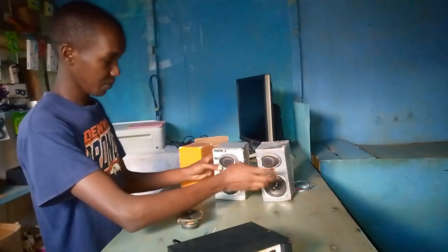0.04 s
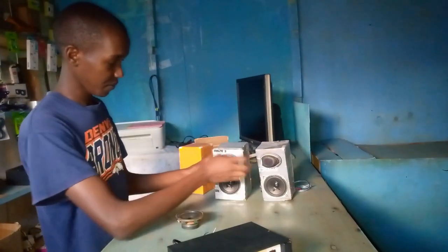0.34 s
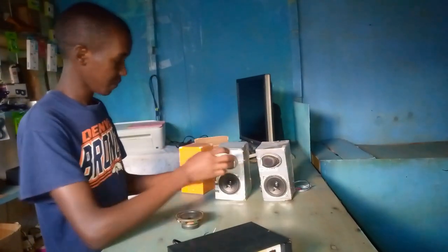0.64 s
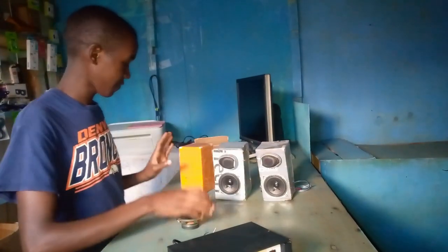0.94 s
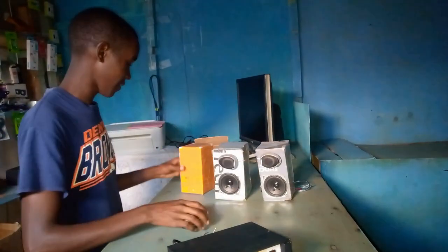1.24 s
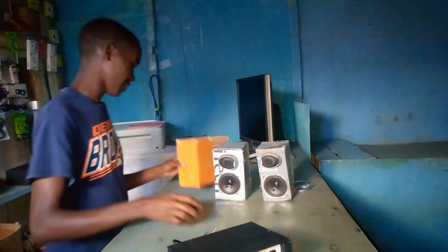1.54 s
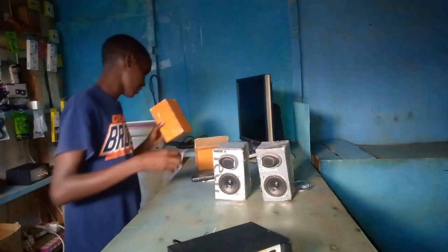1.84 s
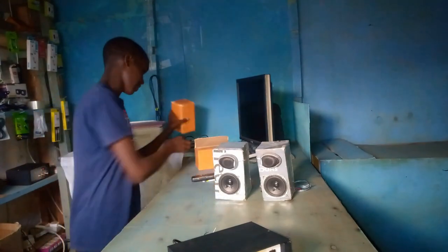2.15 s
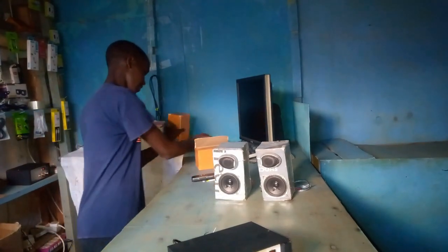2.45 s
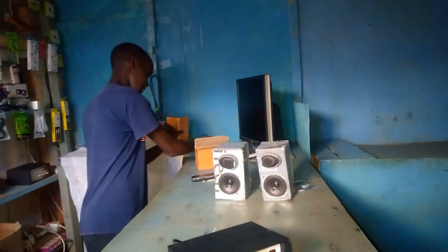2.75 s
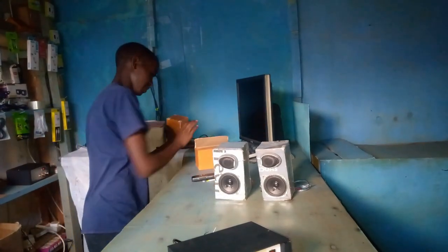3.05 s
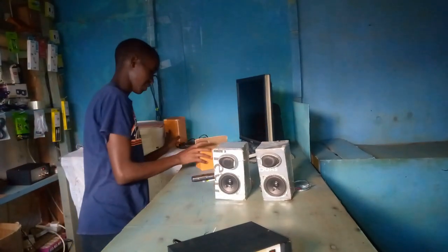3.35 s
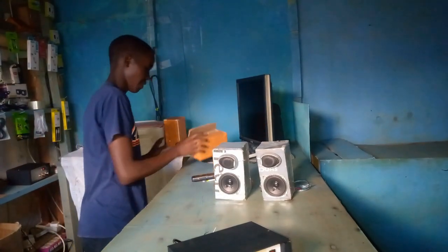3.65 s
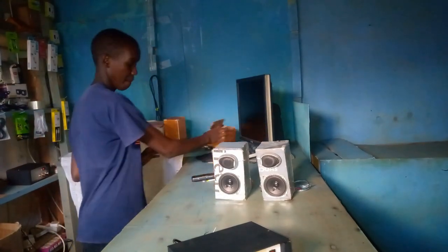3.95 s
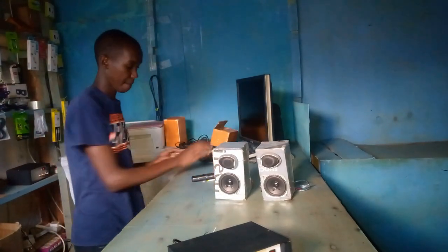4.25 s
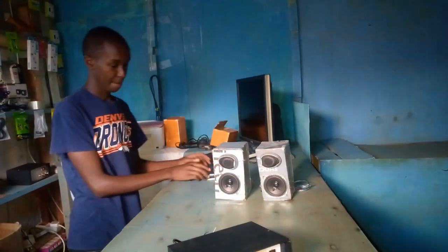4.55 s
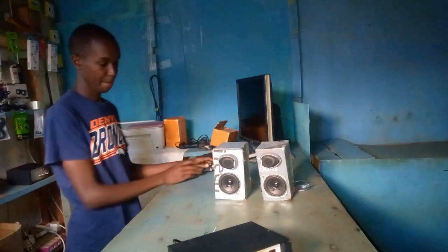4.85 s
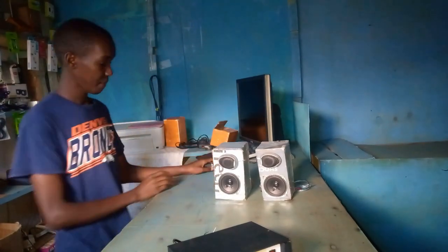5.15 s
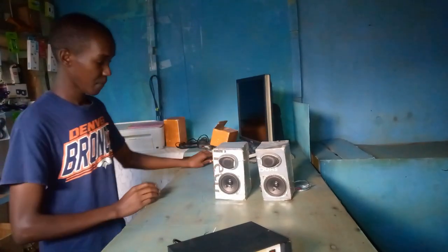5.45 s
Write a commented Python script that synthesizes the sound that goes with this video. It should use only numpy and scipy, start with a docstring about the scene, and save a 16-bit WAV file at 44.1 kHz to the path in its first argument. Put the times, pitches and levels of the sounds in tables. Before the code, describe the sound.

Small cardboard boxes knock, slide and rustle on a wooden workbench, then a hand tool scrapes and bangs close by in a small room.

```python
"""Boxes and a tool on a workbench

Small cardboard boxes are lifted, slid and set down on a wooden bench in a small hard-walled room.
Fingernails tick on plastic cabinets, the bench thuds, cardboard rubs and crunches at the far end; then
a hand tool is dragged and knocked close by, overloading the microphone, and a cabinet is nudged.
Impacts ring damped modes; sliding surfaces excite resonances by stick-slip friction."""
import sys
import numpy as np
from scipy import signal
from scipy.fft import rfft, irfft
from scipy.io import wavfile

SR = 44100
rng = np.random.default_rng(int(sys.argv[2]) if len(sys.argv) > 2 else 0)


def to_wav(s):
    """Save 16-bit WAV."""
    ch = np.atleast_2d(s).T  # columns
    pcm = np.round(np.clip(ch, -1, 1) * 32767)  # PCM
    wavfile.write(sys.argv[1], SR, pcm.astype(np.int16))


N = 246230
FFT_SIZE = 4096
GRID_HZ = np.maximum(np.fft.rfftfreq(FFT_SIZE, 1 / SR), 1)
# edges [Hz] of the five bands in which every bands_db list gives a relative level [dB]
BAND_EDGES_HZ = [100, 450, 1300, 3500, 8000, 16000]
# resonances of rubbed cardboard: (frequency [Hz], width [Hz], lift [dB])
CARDBOARD_RESONANCES = [(260.3, 250, 13.5), (406, 26, 9), (606, 67, 8.5), (1070, 310, 5), (1610, 243, 4)]


def undb(db):
    """Decibels to amplitude ratio."""
    return 10 ** (np.asarray(db) / 20)


def clock(length_s):
    """Sample times in seconds."""
    return np.arange(max(int(length_s * SR), 2)) / SR


def unit(x):
    """Scale to rms 1."""
    return x / np.sqrt(np.mean(x ** 2) + 1e-18)


def add(track, start_s, sound):
    """Superpose a sound on the track."""
    i = int(np.clip(start_s * SR, 0, N - 1))
    track[i:i + len(sound)] += sound[:N - i]


def low_cut(x, hz, order):
    """High-pass filter: small surfaces and small microphones pass little bass."""
    return signal.sosfilt(signal.butter(order, hz, "high", fs=SR, output="sos"), x)


def colour(x, gain_db):
    """Minimum-phase filter with the given gain on the frequency grid."""
    cepstrum = irfft(gain_db * np.log(10) / 20)
    cepstrum[1:FFT_SIZE // 2] *= 2
    cepstrum[FFT_SIZE // 2 + 1:] = 0
    return signal.fftconvolve(x, irfft(np.exp(rfft(cepstrum))))


def tilted(bands_db, db, tilt_db):
    """Spectral tilt: band levels are raised by db and pivoted about their centre of power."""
    edges = np.array(BAND_EDGES_HZ)
    octaves = np.log2(edges[1:] * edges[:-1]) / 2
    pivot = np.average(octaves, weights=undb(bands_db) ** 2)
    return np.array(bands_db) + db + tilt_db * (octaves - pivot)


def band_shape(bands_db, resonances, bass_hz=145, treble_hz=13000):
    """Resonance peaks on a smooth gain curve that brings unit white noise near the band levels."""
    edges = np.array(BAND_EDGES_HZ)
    log_centres = np.log(edges[1:] * edges[:-1]) / 2
    in_band = [(GRID_HZ >= lo) & (GRID_HZ < hi) for lo, hi in zip(edges, edges[1:])]
    fine_db = -11 * np.log10(1 + (bass_hz / GRID_HZ) ** 4) - 10 * np.log10(1 + (GRID_HZ / treble_hz) ** 8)
    for hz, width, lift_db in resonances:
        fine_db += lift_db / (1 + (2 * (GRID_HZ - hz) / width) ** 2)
    smooth_db, gain_db = 0, fine_db
    for _ in range(2):  # bend the smooth part until each band holds its power
        power = [np.mean(undb(gain_db) ** 2 * band) for band in in_band]
        smooth_db = smooth_db + np.array(bands_db) - 10 * np.log10(power)
        gain_db = fine_db + np.interp(np.log(GRID_HZ), log_centres, smooth_db)
    return gain_db


def clicks(contacts, bands_db, ring_s, ring_share, ring_db, tip_s=0.00046):
    """Impact excitation: a noise burst drives one resonance; a shorter contact has a sharper tip."""
    out, t = np.zeros(N), clock(0.03)
    span = len(clock(0.01))  # levels state the energy as an rms over 10 ms
    for start, db, tilt_db, hz, contact_s in contacts:
        envelope = np.exp(-t / contact_s) + ring_share * np.exp(-t / ring_s)
        push = unit(rng.standard_normal(len(t)) * envelope)
        push[0] += tip_s / contact_s * np.sqrt(len(t))
        push *= np.sqrt(span / np.sum(push ** 2))
        gain_db = band_shape(tilted(bands_db, db, tilt_db), [(hz, 0.23 * hz, ring_db)])
        add(out, start, colour(push, gain_db))
    return out


def stroke(length_s, rise_s, fall_s):
    """Exponential attack and release of a movement."""
    t = clock(length_s + 6 * fall_s)
    return (1 - np.exp(-t / rise_s)) * np.exp(-np.maximum(t - length_s, 0) / fall_s)


def friction(size, rate_hz, spread_db, hiss, catch_hz=160, catch_db=3):
    """Stick-slip: many small releases and a few large ones over a hiss, swelling where surfaces catch."""
    slips = (rng.random(size) < rate_hz / SR) * rng.choice([-1, 1], size)
    strength = undb(spread_db * np.minimum(rng.exponential(size=size), 3))
    position = np.arange(size) * catch_hz / SR
    roughness = np.clip(rng.standard_normal(int(position[-1]) + 2), -2, 2)
    grip = undb(catch_db * np.interp(position, np.arange(len(roughness)), roughness))
    return unit(grip * (unit(slips * strength) + hiss * rng.standard_normal(size)))


def scrapes(strokes, bands_db, resonances, rate_hz, spread_db, hiss, rise_s, fall_s):
    """Source and filter: friction is heard through the resonances of the rubbed body."""
    out = np.zeros(N)
    for start, end, db, tilt_db in strokes:
        envelope = stroke(max(end - start, 0.005), rise_s, fall_s)
        force = envelope * friction(len(envelope), rate_hz, spread_db, hiss)
        add(out, start, colour(force, band_shape(tilted(bands_db, db, tilt_db), resonances)))
    return out


def knocks(blows, modes, crack_db, crack_s, detune=0.0084):
    """Modal ringing: a blow starts damped sinusoids; the many weaker modes merge in a noisy crack."""
    out, t = np.zeros(N), clock(0.4)
    mode_hz, mode_db, _ = np.transpose(modes)
    skirts_db = -20 * np.log10(1 + (GRID_HZ / mode_hz[-1]) ** 2 + (mode_hz[0] / GRID_HZ) ** 2)
    crack_shape = np.interp(np.log(GRID_HZ), np.log(mode_hz), mode_db) + skirts_db
    for start, db, ratio in blows:
        ring = np.zeros(len(t))
        for k, (hz, gain_db, t60) in enumerate(modes):
            phase = 2 * np.pi * hz * ratio * (1 + detune * rng.standard_normal()) * t
            ring += (-1) ** k * undb(gain_db) * np.sin(phase) * undb(-60 * t / t60)
        burst = rng.standard_normal(len(t)) * np.exp(-t / crack_s)
        crack = colour(burst, crack_shape)[:len(t)]
        knock = ring / np.abs(ring).max() + undb(crack_db) * crack / np.abs(crack).max()
        add(out, start, undb(db) * knock)
    return out


def noise_floor(level_db=-49.5):
    """Stationary noise: microphone hiss and quiet room air."""
    spectrum = [(18, -37), (30, -10.5), (332, -4), (399, -6.5), (532, -4.5), (1200, -7), (1970, -9.5),
                (3780, -11.5), (4780, -11.5), (5170, -14), (5890, -13.5), (15500, -16.5)]  # (frequency [Hz], relative density [dB])
    hz, db = np.transpose(spectrum)
    gain_db = np.interp(np.log(GRID_HZ), np.log(hz), db)
    return undb(level_db) * unit(colour(rng.standard_normal(N), gain_db)[:N])


def fingernails():
    """Brief hard contact: nails tick on plastic and card."""
    # (time [s], level [dB], tilt [dB/octave], resonance [Hz], contact [s])
    ticks = [(.017, -45.5, 2, 4000, 0.00096), (.2283, -37.5, -1, 2750, 0.00034),
             (.6842, -30, -1.2, 1800, .0005), (.9818, -52.5, 3, 2910, 0.0015),
             (1.1641, -31, 1.5, 2300, 0.0004), (3.6135, -31, 0, 2070, 0.0011), (4.47, -42.5, 6, 4020, .002),
             (5.177, -31, -7.5, 1680, .003), (5.224, -35.5, -1, 2490, .0028),
             (5.275, -28.5, -4.5, 1820, 0.0015), (5.285, -29, -4.5, 1740, 0.0024),
             (5.3773, -40, -3, 1790, 0.003), (5.5612, -27, -4.5, 2450, 0.0029),
             (5.5683, -15, -2.5, 3270, .00065)]
    bands_db = [-14.5, -7.5, 0.5, -3.5, -12.5]
    return clicks(ticks, bands_db, ring_s=0.0043, ring_share=0.73, ring_db=7.5)


def edge_snaps():
    """Elastic release: hard edges catch and snap free."""
    # (time [s], level [dB], tilt [dB/octave], resonance [Hz], contact [s])
    snaps = [(.0673, -38.5, -0.9, 6100, .0005), (3.0008, -44, 2, 6530, .0004),
             (3.397, -36, 0.5, 5800, 0.0008), (3.8911, -39, -3, 4500, 0.00085),
             (4.6178, -13.5, -0.5, 5260, .001), (4.6858, -16, -1, 4750, 0.0035),
             (4.8373, -14, -0.5, 6550, .0005), (4.888, -27.5, -1, 5170, 0.0018),
             (4.9423, -39.5, 9, 6960, .003), (4.995, -41.5, -0.5, 7500, 0.00057),
             (5.158, -33.5, -4, 4870, .0005), (5.2, -21.5, -0.5, 4900, 0.00063)]
    bands_db = [-15.5, -11, -9.5, -1.5, -9]
    return clicks(snaps, bands_db, ring_s=0.005, ring_share=0.43, ring_db=11)


def box_slides_and_low_ring():
    """Sliding friction drives box resonances; the second row is a low ring after the first bench thud."""
    spans = [(.07, .14, -54.5, -1.5), (.35, .41, -58.5, -7.5), (1.385, 1.49, -44.5, 0.5),
             (1.505, 1.6, -50, 1.5), (2.46, 2.59, -53.5, 2.5), (2.6, 2.635, -42, 2), (2.92, 3.13, -40, 0),
             (3.13, 3.29, -46, 0.5), (3.33, 3.42, -40, 0.5), (3.43, 3.48, -35.5, -0.5),
             (3.93, 3.985, -30, 0), (4.155, 4.2, -27.5, 0)]  # (start [s], end [s], level [dB], tilt [dB/octave])
    bands_db = [0, 0, -10, -15.5, -22]
    return scrapes(spans, bands_db, CARDBOARD_RESONANCES,
                   rate_hz=3500, spread_db=2, hiss=1.45, rise_s=0.00062, fall_s=0.0077)


def bench_thuds():
    """Plate vibration: soft blows ring the low modes of the bench top."""
    blows = [(.272, -21, 1), (.557, -25.5, 0.88), (.639, -29, 1.27), (1.502, -32.5, 1.4),
             (2.599, -23, 1.26), (2.796, -19, 0.95), (3.3, -21, 1.1), (3.446, -21, 0.89),
             (3.464, -28, 0.99), (3.903, -23.5, 1.04), (3.932, -19, 1.118), (4.09, -17.5, 1.135),
             (4.157, -15, 0.99), (4.184, -24, 0.98), (4.852, -8, 0.94), (4.87, -16.5, 1.215),
             (4.94, -17.5, 0.934), (5.195, -22, 0.99), (5.262, -18, 0.88), (5.28, -31, 0.95),
             (5.57, -16.5, 0.86)]  # (time [s], level [dB], pitch ratio)
    modes = [(176.6, -3.5, 0.088), (216.3, -1.5, 0.043), (275.4, -8, 0.069), (329.8, -11, 0.0755),
             (455, -21, 0.103), (710, -24.5, 0.09)]  # (frequency [Hz], level [dB], T60 [s])
    return low_cut(knocks(blows, modes, crack_db=-1.5, crack_s=0.014), hz=92.5, order=3)


def corner_bumps():
    """Damped impact: carton corners bump the bench and each other."""
    # (time [s], level [dB], tilt [dB/octave], resonance [Hz], contact [s])
    bumps = [(.2741, -37.5, 3.5, 481, 0.0027), (.6436, -31.5, -1, 564, 0.0017), (1.3675, -43, 2, 605, .002),
             (1.5006, -26, 1, 1500, 0.0028), (2.6115, -36, 2, 815, 0.0034), (2.7619, -14, -2, 1110, .0036),
             (2.796, -28, 1, 1090, .0034), (3.277, -35.5, -1.5, 667, .001), (3.2974, -25, 2, 614, 0.00063),
             (3.508, -40, -1, 640, .0014), (3.9327, -28, -4, 590, 0.0019), (3.9451, -23, 0.5, 1150, .0024),
             (3.9506, -24, 1, 860, 0.0017), (4.155, -17, .3, 940, 0.0012)]
    bands_db = [-10.5, -1, -7, -16.5, -26.5]
    return clicks(bumps, bands_db, ring_s=0.0071, ring_share=0.48, ring_db=6)


def finger_rubs():
    """Light friction, mostly hiss: fingers and cloth brush over cardboard."""
    rubs = [(.275, .305, -45.5, -3.5), (1.18, 1.29, -51, -2), (1.405, 1.455, -46, 3.5),
            (1.675, 1.7, -47.5, -0.5), (1.7, 1.722, -39, -.3), (1.79, 1.98, -52.5, 0),
            (1.99, 2.04, -48.5, 0), (2.402, 2.43, -49.5, -2.5), (3.5, 3.54, -54.5, 4.5),
            (4.47, 4.53, -41, 0)]  # (start [s], end [s], level [dB], tilt [dB/octave])
    bands_db = [-15, -6, 1, 0, -9.5]
    return scrapes(rubs, bands_db, CARDBOARD_RESONANCES,
                   rate_hz=2900, spread_db=6.5, hiss=2.3, rise_s=0.0016, fall_s=0.0165)


def hollow_knocks():
    """Hollow-body resonance: struck cartons and cabinets ring with almost no crack."""
    blows = [(.422, -36.5, 0.98), (.6435, -26, 1.04), (1.5015, -26, 1.47), (1.52, -26.5, 0.99),
             (3.2985, -5, 1), (3.447, -24, 1.03)]  # (time [s], level [dB], pitch ratio)
    modes = [(248.7, -4.5, 0.093), (323, -8.5, 0.1), (375, -3, 0.043), (421, 1.5, 0.062), (571, -3, 0.083),
             (650, -3.5, 0.11), (716, -10.5, 0.041), (1340, -29, 0.137), (1500, -44, 0.086)]  # (frequency [Hz], level [dB], T60 [s])
    return low_cut(knocks(blows, modes, crack_db=-43, crack_s=0.0064), hz=184, order=3)


def plastic_taps():
    """Shell vibration: light taps ring the high, short-lived modes of thin plastic."""
    taps = [(.6846, -19.5, 0.98), (2.404, -31, 0.76), (3.6137, -20.5, 1.037), (5.2755, -18, 1.1),
            (5.286, -18, 1.12)]  # (time [s], level [dB], pitch ratio)
    modes = [(1267, -1.5, 0.031), (1475, 3, 0.034), (1596, -4.5, 0.019), (1840, -1, 0.014),
             (2020, -1, 0.019), (2240, -2, 0.0218), (3120, -25, 0.037)]  # (frequency [Hz], level [dB], T60 [s])
    return knocks(taps, modes, crack_db=-16, crack_s=0.0047)


def box_landings():
    """Panel vibration: a closed box lands edge first and rocks, ringing at each blow."""
    blows = [(2.7562, -8, 0.99), (2.7618, -7, 0.97), (2.778, -20, 0.92), (2.8, -30, 1), (4.0865, -13, 0.98),
             (4.1015, -11, 0.93)]  # (time [s], level [dB], pitch ratio)
    modes = [(167, -6.5, 0.13), (360, -1, 0.095), (750, -10, 0.089), (980, -10, 0.39), (1165, 4, 0.092),
             (1366.4, -1, 0.11), (1460, -12.5, 0.123), (1670, -8, 0.14), (1817, 5, 0.019), (1984, -17, 0.1),
             (2160, -5.5, 0.029), (2860, -15, 0.043)]  # (frequency [Hz], level [dB], T60 [s])
    return low_cut(knocks(blows, modes, crack_db=-9, crack_s=0.0028), hz=161, order=4)


def flap_crunch():
    """Bursts of stick-slip drive the resonances of a stiff flap."""
    crunches = [(4.0845, 4.0895, -18.5, 0), (4.098, 4.11, -17.5, 0.65), (4.114, 4.15, -30.5, -.5)]  # (start [s], end [s], level [dB], tilt [dB/octave])
    resonances = [(790, 175, -1), (1180, 200, 1), (2170, 73, 6)]  # (frequency [Hz], width [Hz], lift [dB])
    bands_db = [-7, -1, -0.5, -1.5, -11]
    return scrapes(crunches, bands_db, resonances,
                   rate_hz=3500, spread_db=2.5, hiss=0.92, rise_s=0.00037, fall_s=0.0046)


def tool_drag(pull_start_s=4.606):
    """Stick-slip at two scales: the tool judders in coarse slips as its edge hisses over the grain."""
    # pulled until it catches, it then scuffs to rest: (time [s], judder level [dB], hiss level [dB])
    pull = [(4.636, -31, -37.5), (4.676, -24, -40), (4.688, -27, -25), (4.702, -26.5, -36),
            (4.738, -13.5, -26.5), (4.766, -12, -27.5), (4.784, -26, -26.5), (4.806, -23, -25.5),
            (4.83, -26, -32)]
    settle = [(4.882, -25, -37), (4.906, -29.5, -59), (4.948, -31, -43), (4.962, -32, -77),
              (5.05, -32.5, -56)]
    # low resonances, and narrow treble peaks that colour the hiss: (frequency [Hz], width [Hz], lift [dB])
    peaks = [(112, 60, -4), (178, 23, 4.5), (240, 38.4, 5), (360, 54, 2.5), (436, 18.4, 3), (524.5, 18, 9),
             (780, 24, 4.5), (1022, 85, 2.5), (1210, 170, 5.5), (1386, 65, 8.5), (1740, 340, 4.5),
             (2656, 730, -7.5), (4430, 49, 7), (4733, 42, 5), (5262, 63, 2), (5600, 33, 3), (6298, 24.5, 2),
             (11650, 1430, 5), (15700, 1930, -17)]
    judder_bands_db = [-2.5, -4, -8.5, -29, -36]
    hiss_bands_db = [-24, -9, 2.5, 6.5, -1.5]
    out = np.zeros(N)
    for start, curve in ((pull_start_s, pull), (settle[0][0], settle)):
        times, judder_db, hiss_db = np.transpose(curve)
        t = start + clock(times[-1] - start)
        judder = friction(len(t), rate_hz=1000, spread_db=3.8, hiss=0.74, catch_db=2.5)
        judder *= undb(np.interp(t, times, judder_db))
        hiss = friction(len(t), rate_hz=2500, spread_db=1, hiss=1, catch_db=2)
        hiss *= undb(np.interp(t, times, hiss_db))
        add(out, start, colour(judder, band_shape(judder_bands_db, peaks)))
        add(out, start, colour(hiss, band_shape(hiss_bands_db, peaks)))
    return out


def tool_knocks():
    """Hard impact: the tool strikes the bench close by."""
    # (time [s], level [dB], tilt [dB/octave], resonance [Hz], contact [s])
    strikes = [(4.7657, -14.5, 2.5, 1290, 0.002), (4.8484, -8, 0.5, 1150, 0.00036),
               (4.8672, -8.5, 0.5, 1000, 0.00053), (4.8705, -13.5, -0.5, 1400, 0.0012)]
    bands_db = [-4.5, -1.5, -10.5, -19, -32]
    return clicks(strikes, bands_db, ring_s=0.0039, ring_share=0.34, ring_db=8)


def cabinet_nudges():
    """Sliding friction drives the resonances of a small speaker cabinet."""
    nudges = [(5.04, 5.14, -41.5, 2), (5.147, 5.19, -22.5, -0.5), (5.205, 5.25, -32.5, 1.5),
              (5.255, 5.293, -25, -0.5), (5.3, 5.4, -50.5, 2.5)]  # (start [s], end [s], level [dB], tilt [dB/octave])
    resonances = [(177, 59, 1.5), (256, 27, 8.5), (412, 150, -1), (940, 79, 8.5), (1290, 53, 9),
                  (1604, 260, 4.5), (1780, 200, 6.5), (2780, 850, -12), (4820, 1000, 6.5), (12000, 2600, 8)]  # (frequency [Hz], width [Hz], lift [dB])
    bands_db = [0.5, -5, -3, -16, -20.5]
    return scrapes(nudges, bands_db, resonances,
                   rate_hz=2200, spread_db=4, hiss=0.87, rise_s=0.0036, fall_s=0.0064)


def skid_whistles(width_hz=600):
    """Narrow-band noise: a smooth skid whistles faintly in one resonance."""
    skids = [(5.403, 5.483, -35, 4340), (5.492, 5.56, -38.5, 4300)]  # (start [s], end [s], level [dB], frequency [Hz])
    out = np.zeros(N)
    for start, end, db, hz in skids:
        envelope = stroke(end - start, rise_s=0.0426, fall_s=0.018)
        peak_db = -10 * np.log10(1 + (2 * (GRID_HZ - hz) / width_hz) ** 2)
        whistle = colour(rng.standard_normal(len(envelope)), peak_db)[:len(envelope)]
        add(out, start, undb(db) * envelope * unit(whistle))
    return out


def reverberation(direct, gap_s=0.0055, build_s=0.003, top_hz=9000):
    """Diffuse field: echoes build after a gap, die sooner in the treble and gain share with distance."""
    echo_levels = [(0, -14), (.65, -8), (1.5, -7.5), (2.6, -3.5), (3.5, -6), (4.55, -5.5), (4.87, -21),
                   (5.3, -19.5), (5.58, -17.5)]  # higher for distant sources: (time [s], level [dB])
    decay_times = [(150, 0.42), (400, 0.44), (1040, 0.5155), (2760, 0.5), (7280, 0.38), (15000, 0.29)]  # (frequency [Hz], T60 [s])
    t = clock(0.8)
    spectrum = rfft(rng.standard_normal(len(t)))
    hz = np.maximum(np.fft.rfftfreq(len(t), 1 / SR), 1)
    centres, t60s = np.transpose(decay_times)
    tail = np.zeros(len(t))
    for share, t60 in zip(np.eye(len(t60s)), t60s):
        band = irfft(spectrum * np.interp(np.log(hz), np.log(centres), share), len(t))
        tail += band * undb(-60 * t / t60)
    build_up = 1 - np.exp(-np.maximum(t - gap_s, 0) / build_s)
    tail = unit(tail * build_up) / np.sqrt(len(t))
    response = colour(tail, -10 * np.log10(1 + (GRID_HZ / top_hz) ** 4))
    send = undb(np.interp(np.arange(N) / SR, *np.transpose(echo_levels)))
    return low_cut(signal.fftconvolve(direct * send, response)[:N], hz=123, order=3)


def scene():
    """Superposition of direct sound, reverberation and noise in one channel."""
    direct = tool_drag() + skid_whistles()
    direct += fingernails() + edge_snaps() + corner_bumps() + tool_knocks()
    direct += bench_thuds() + box_landings() + hollow_knocks() + plastic_taps()
    direct += finger_rubs() + box_slides_and_low_ring() + flap_crunch() + cabinet_nudges()
    direct = low_cut(direct, hz=63, order=1)
    return (direct + reverberation(direct) + noise_floor())[None]


def record(dry, top_hz=15900):
    """Overload: the nearest knocks clip, and a steep low-pass filter limits the bandwidth."""
    clipped = np.clip(dry, -1, 1)
    return signal.sosfilt(signal.ellip(10, 0.2, 80, top_hz, fs=SR, output="sos"), clipped)


dry = scene()
out = record(dry)
to_wav(out)
```